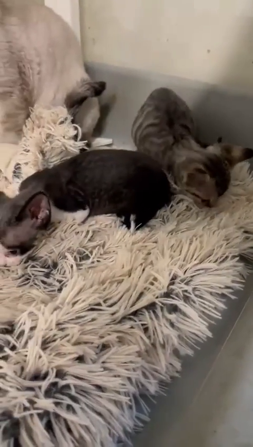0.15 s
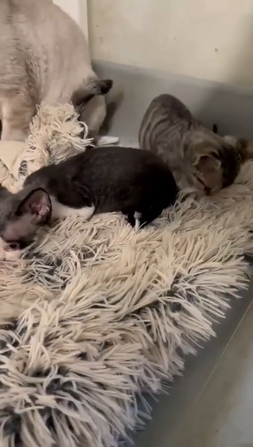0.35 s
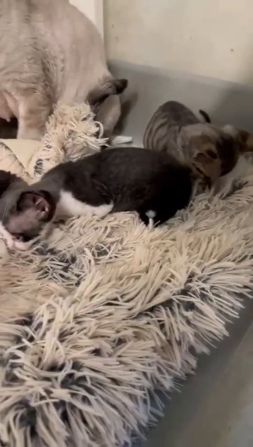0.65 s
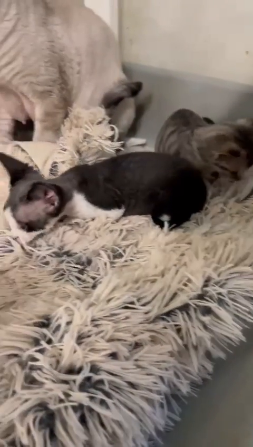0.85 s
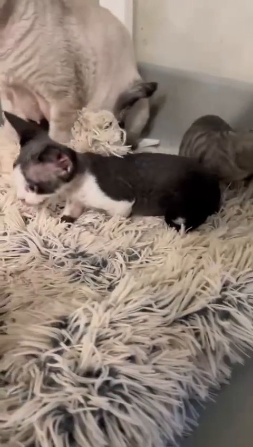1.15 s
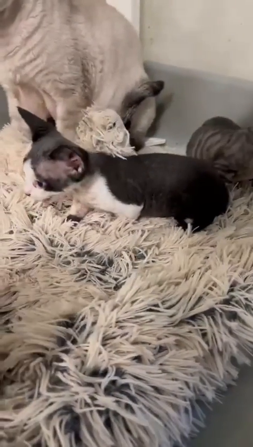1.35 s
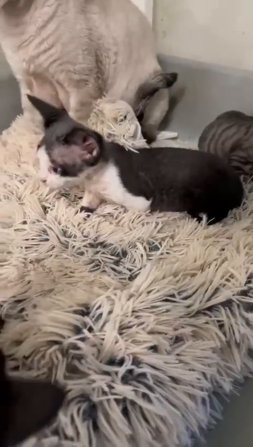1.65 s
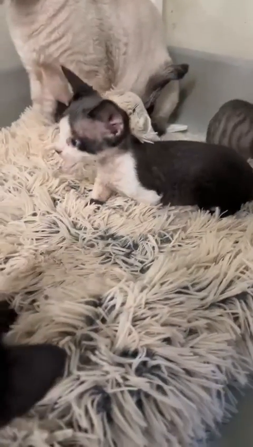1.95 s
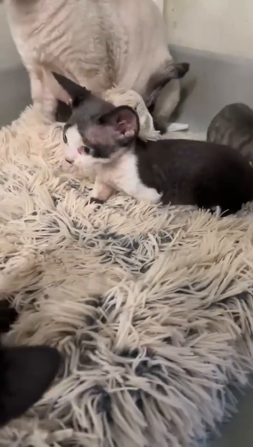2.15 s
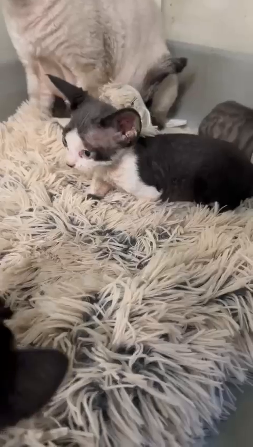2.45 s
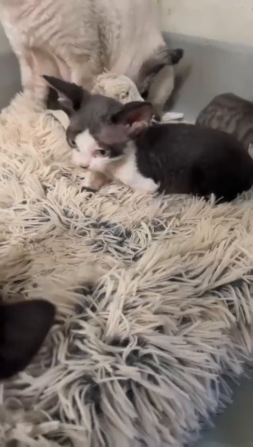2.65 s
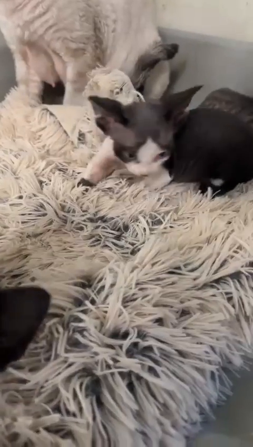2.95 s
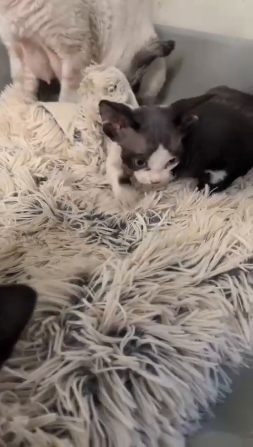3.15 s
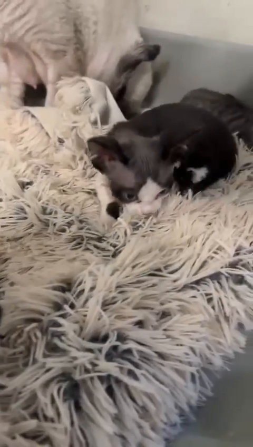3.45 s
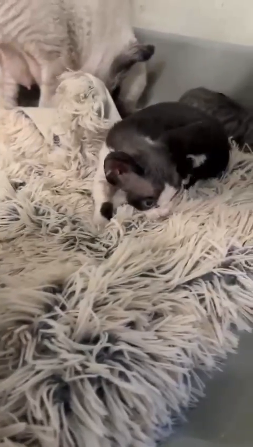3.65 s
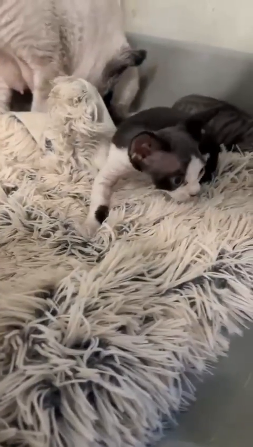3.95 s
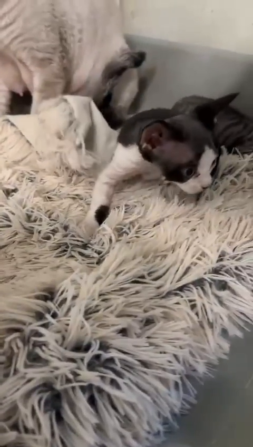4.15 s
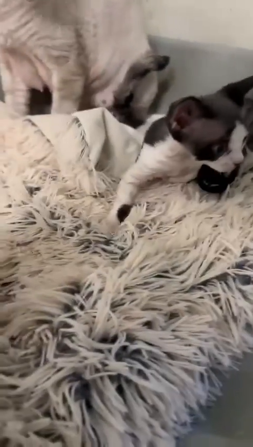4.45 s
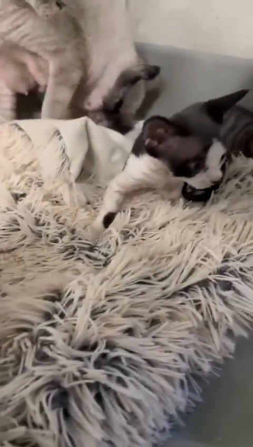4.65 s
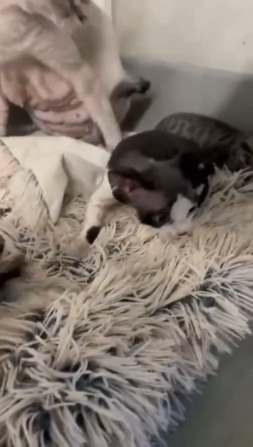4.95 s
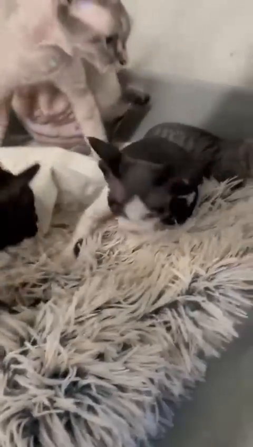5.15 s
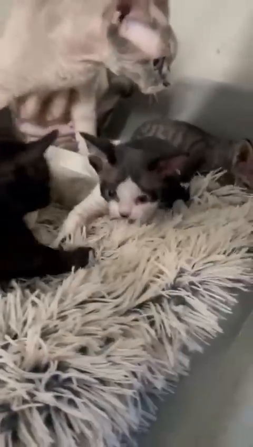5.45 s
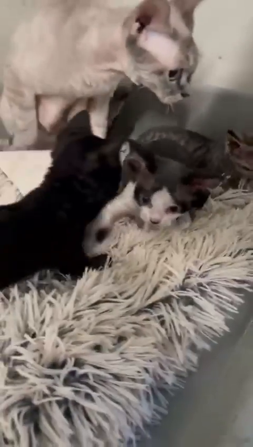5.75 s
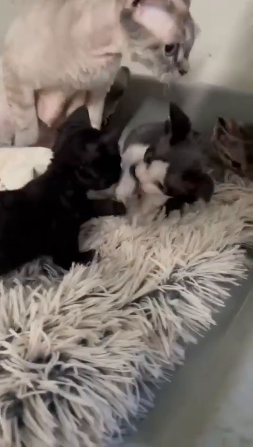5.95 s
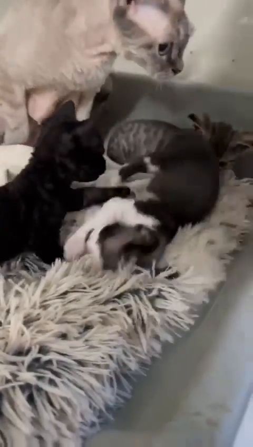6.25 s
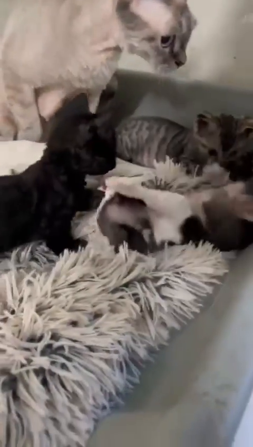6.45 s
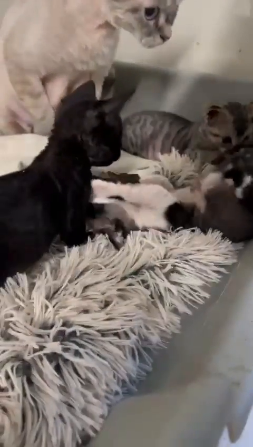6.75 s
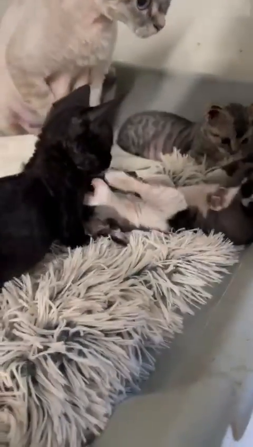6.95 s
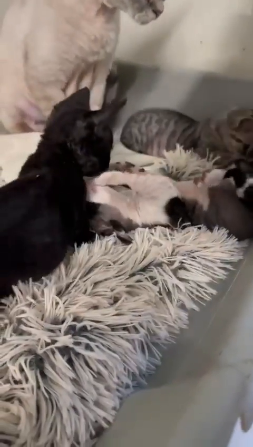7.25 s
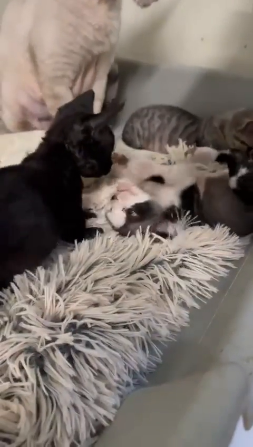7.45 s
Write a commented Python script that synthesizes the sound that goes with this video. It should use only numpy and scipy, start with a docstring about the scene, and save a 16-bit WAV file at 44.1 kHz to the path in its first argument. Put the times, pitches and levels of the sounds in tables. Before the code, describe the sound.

Kittens shuffle on a shaggy cushion in a plastic bed, scuffling with thumps, a whimper, a short trilling mew and one very hard knock.

```python
"""Kittens wrestle on a shaggy cushion in a plastic bed in a small, quiet room, close to a phone.
Bodies thud on the shell (filtered flexing modes), paws stamp (one damped swing), fur and claws scrape (noise);
knocks, one very hard, are a ping, a crack, a wash and a ring, and a thin tone follows the hardest.
One kitten whimpers and later gives a short trilling mew (harmonics through moving resonances).
The walls add a brief echo; filtered noise makes a low rumble and faint hiss."""
import sys
import numpy as np
from scipy import signal
from scipy.fft import rfft, irfft
from scipy.io import wavfile

SR = 44100
rng = np.random.default_rng(int(sys.argv[2]) if len(sys.argv) > 2 else 0)


def generate_wav(signal):
    """Clip the signal to [-1, 1] and save it as 16-bit WAV at the path in sys.argv[1]."""
    frames = np.transpose(np.atleast_2d(signal))
    scaled = np.clip(frames, -1, 1) * 32767
    pcm = np.round(scaled).astype(np.int16)
    wavfile.write(sys.argv[1], SR, pcm)


N = 334895
RING_T_S = np.arange(SR * 3 // 4) / SR  # time axis of blows and echo


def undb(db):
    """Decibels to gain."""
    return 10 ** (np.asarray(db) / 20)


def unit(x):
    """Scale to rms 1."""
    return x / np.sqrt(np.mean(x ** 2))


def add(track, start_s, sound):
    """Mix a sound into a track at start_s."""
    i = max(int(start_s * SR), 0)
    track[i:i + len(sound)] += sound[:N - i]


def colour(x, points):
    """Filter by a spectrum of (hz, level_db) points, interpolated over log frequency."""
    hz, level_db = np.transpose(points)
    f_hz = np.fft.rfftfreq(x.shape[-1], 1 / SR) + 1
    gain = undb(np.interp(np.log(f_hz), np.log(hz), level_db))
    return irfft(rfft(x) * gain, x.shape[-1])


def band(x, lo_hz, hi_hz, order=1):
    """Causal Butterworth band-pass."""
    edges_hz = [lo_hz, min(hi_hz, SR / 2 - 1000)]
    return signal.sosfilt(signal.butter(order, edges_hz, "band", fs=SR, output="sos"), x)


def ring(modes, scatter_db):
    """Decaying modes (hz, level_db, t60_s); each blow lands elsewhere and weights them afresh."""
    hz, level_db, t60_s = np.transpose(modes)[:, :, None]
    scatter = scatter_db * rng.standard_normal(hz.shape)
    size = undb(level_db + scatter - 60 * RING_T_S / t60_s)
    return np.sum(size * np.sin(2 * np.pi * hz * RING_T_S), axis=0)


def grains(count, rough_db):
    """Dense friction noise: tiny slips of uneven size, each under a millisecond."""
    slips = np.repeat(rng.standard_normal(count // 32 + 1), 32)[:count]
    return unit(rng.standard_normal(count) * undb(rough_db * slips))


def diffuse(count, alike=0):
    """Stereo noise from all sides at two spaced ports: alike in the bass, apart in the treble unless alike > 0."""
    port_gap_s = .00054
    f_hz = np.fft.rfftfreq(count, 1 / SR)
    share = np.clip(alike, 0, .95)
    likeness = share + (1 - share) * np.sinc(2 * f_hz * port_gap_s)
    weights = np.sqrt([1 + likeness, 1 - likeness])
    mid, side = irfft(rfft(rng.standard_normal((2, count))) * weights, count)
    return np.array([mid + side, mid - side]) / np.sqrt(2)


def from_left(x, pan_db):
    """Sound from the left reaches that port first and louder."""
    lag_samples = 23
    return np.array([x * undb(pan_db / 2), np.roll(x, lag_samples) * undb(-pan_db / 2)])


def room(x, wet_db, t60_low_s=.3, t60_high_s=.18):
    """Close walls follow the direct sound with a dense, short echo that holds little deep bass."""
    ears = band(diffuse(len(RING_T_S)), 162, 12600, order=2)
    low = band(ears, 100, 2100)
    high = ears - low
    tail = low * 1000 ** (-RING_T_S / t60_low_s) + high * 1000 ** (-RING_T_S / t60_high_s)
    tail *= RING_T_S > .002  # gap before the echo, s
    tail *= undb(wet_db) / np.sqrt(np.sum(tail ** 2) / 2)
    return x + signal.fftconvolve(np.atleast_2d(x), tail, axes=1)[:, :N]


def push(length_s):
    """Envelope of one shift: the kitten leans in, eases off and stops."""
    rise_share, fade_db, release_s = .22, 10, .03
    t_s = np.arange(0, length_s, 1 / SR)
    rise_s = rise_share * length_s
    easing = undb(-fade_db * np.maximum(t_s - rise_s, 0) / (length_s - rise_s))
    return np.minimum(t_s / rise_s, 1) * easing * np.minimum((length_s - t_s) / release_s, 1)


def shuffling():
    """Paws knead the padding with a low mutter while the shaggy pile rustles."""
    # kitten shifting on the cushion, relative levels: start_s, length_s, weight_db, rub_db
    shifts = [(0, 0.1, -52.5, -74.5), (0.09, 0.25, -50.5, -71), (0.278, 0.38, -58, -77.5),
              (0.52, 0.25, -60.5, -73), (0.749, 0.31, -60.5, -74.5), (0.982, 0.28, -68, -84),
              (1.5, 0.33, -69, -81.5), (1.639, 0.71, -63.5, -80.5), (2.16, 0.33, -63.5, -77),
              (2.501, 0.12, -55.5, -78.5), (2.81, 0.13, -64.5, -85), (3.184, 0.51, -74.5, -85),
              (3.984, 0.08, -101, -80), (4.83, 0.3, -77, -77), (5.136, 0.13, -58, -73.5),
              (5.381, 0.49, -86, -78.5), (6.038, 0.71, -102, -79), (6.371, 0.066, -54.5, -74),
              (7.333, 0.15, -76, -71.5)]
    # spectrum of the padding: hz, level_db
    padding = [(24, -46), (40, 7), (130, -4.5), (177, -21), (278, -18), (475, -25.5), (560, -23),
               (745, -29), (916, -32.5), (2500, -42.5), (3250, -61), (5500, -120)]
    # spectrum of the pile: hz, level_db
    fur = [(500, -9), (1000, 5.5), (2200, 10), (4000, 4), (6500, 2.5), (8500, -13.5), (11000, -6.5)]
    # the padding stirs faintly between shifts too
    restless_db, wander_db = -82, 4
    wander = unit(band(rng.standard_normal(N), 0.39, 17.0, order=2))
    weight = undb(restless_db + wander_db * wander)
    rub = np.zeros(N)
    for start_s, length_s, weight_db, rub_db in shifts:
        add(weight, start_s, undb(weight_db) * push(length_s))
        add(rub, start_s, undb(rub_db) * push(length_s))
    mutter = colour(grains(N, rough_db=4.5), padding)
    mutter /= np.std(band(mutter, 200, 900, order=3))
    rustle = unit(colour(grains(N, rough_db=7.5), fur))
    return undb(-2) * weight * mutter + undb(7) * rub * rustle


def air():
    """The building rumbles from all sides; a faint steady hiss sits near the middle."""
    # overall spectrum of the background: hz, level_db
    background = [(15, -51), (25, -4), (71, 5.5), (99, -2.5), (260, -27.5), (303, -12), (336, -24),
                  (381, -27), (468, -34.5), (721, -34), (954, -39.5), (2270, -27), (3320, -36),
                  (7700, -46.5), (11000, -69.5), (14300, -96), (22000, -120)]
    level_db = -60
    rumble = colour(diffuse(N, alike=0), [(1000, -0.5), (1800, -18.5), (3000, -29.5)])
    hiss = colour(diffuse(N, alike=0.81), [(600, -31.5), (1100, 0.5), (1700, 5.5)])
    noise = band(colour(rumble + hiss, background), 32, 20000, order=2)
    return undb(level_db) * noise / np.std(noise.mean(axis=0))


def bumps():
    """A soft body sets the shell flexing; modes near its own pace answer most."""
    # bodies on the shell, heavier and softer pushes lower: start_s, level_db (peak, dry), centre_hz
    bump_table = [(.005, -45.5, 251), (0.123, -38.5, 166), (0.171, -41, 209), (.185, -38.5, 110),
                  (0.347, -42.5, 237), (0.564, -41.5, 163), (0.814, -54.5, 236), (1.971, -32, 71.4),
                  (1.992, -31, 247), (2.008, -26.5, 287), (2.032, -26, 89), (2.076, -31.5, 117),
                  (2.111, -35, 199), (2.166, -36, 102), (2.24, -36.5, 149), (2.283, -36, 55.5),
                  (2.541, -47.5, 244), (2.607, -46.5, 61), (2.867, -53.5, 250), (4.316, -52.5, 170),
                  (5.076, -28, 380), (5.083, -28.5, 166), (5.102, -38.5, 76), (5.75, -47, 104),
                  (6.414, -32, 45.6), (6.449, -37, 43)]
    # low flexing modes of the loaded shell: hz, level_db, t60_s
    flex = [(52, 0, .22), (66, -5, .16), (91, 0, .22), (116, -4, .16), (140, -3, .18), (170, -7, .1),
            (198, -3, .13), (240, -7, .08), (278, 2, .13), (312, -2, .09), (355, -10, .06), (409, -11, .1),
            (479, -12, .06), (635, -9, .06)]
    out = np.zeros(N)
    for start_s, level_db, centre_hz in bump_table:
        thud = band(ring(flex, scatter_db=3), centre_hz / 1.32, centre_hz * 1.4, order=2)
        add(out, start_s, undb(level_db) * thud / np.abs(thud).max())
    return out


def scrapes():
    """Claws and fur skid over the plastic in short strokes; a claw that catches rasps in a narrow band."""
    # strokes along the wall: start_s, length_s, level_db (relative), rough_db, centre_hz, width_octaves
    strokes = [(0.103, 0.039, -57.5, 3, 1850, 2.6), (0.163, 0.067, -53, 4.5, 935, 2.73),
               (0.543, 0.025, -60, -7, 1880, 2.2), (0.617, 0.049, -69.5, 0, 4200, 1.2),
               (0.814, 0.011, -64, 12, 4000, 0.79), (0.879, 0.072, -68, 2, 4640, 1.9),
               (1.965, 0.087, -52, -2.5, 3620, 2.3), (1.991, 0.045, -45, 7, 4260, 1.1),
               (1.992, 0.058, -47, 6, 590, 2.1), (2.042, 0.06, -54.5, 2, 1470, 2.9),
               (2.164, 0.055, -41.5, 11, 5130, 1.7), (2.167, 0.043, -43.5, 4, 2190, 0.38),
               (2.165, 0.057, -51, -4.5, 560, 1.6), (5.012, 0.046, -63, 8, 4370, 2),
               (6.383, 0.014, -51.5, 1.5, 534, 0.6), (6.406, .013, -56, 4.5, 640, 0.74)]
    out = np.zeros(N)
    for start_s, length_s, level_db, rough_db, centre_hz, width_octaves in strokes:
        count, spread = int(length_s * SR), 2 ** (width_octaves / 2)
        noise = grains(len(RING_T_S), rough_db)
        skid = unit(band(noise, centre_hz / spread, centre_hz * spread, order=2)[:count])
        add(out, start_s, undb(level_db) * skid * signal.windows.tukey(count, 0.29))
    return out


def knocks():
    """A dead ping at the contact; a crack, a short wash of dense modes and a ring from the whole shell."""
    # knocks and claw taps: start_s, level_db (relative), contact_hz, ring_db and ping_db (re level_db)
    knock_table = [(0.168, -40.5, 900, 3, -1), (1.057, -49, 1390, -28, 5.5), (1.538, -54, 1010, 3, 3.5),
                   (1.6, -55, 1130, -20, 5.5), (2.112, -32.5, 3280, -3.5, -16),
                   (2.158, -28, 1480, -3, -1.5), (2.175, -32, 2050, -22, 7), (2.201, -30, 2180, -27, -7),
                   (2.464, -45, 1580, -11, -11), (2.524, -50, 730, 7, 10.5), (4.004, -47, 980, -11.5, -2),
                   (4.99, -40.5, 2780, -2, -11), (5.056, -29, 1200, 7, -4), (5.067, -12.5, 2220, -8, -4.5),
                   (5.068, -20, 950, -2, -0.5), (5.077, -25.5, 4200, -16, -25), (5.111, -40, 450, -17, -5),
                   (5.7435, -37, 3460, -20, 0.5), (5.746, -40, 880, -7, -7),
                   (5.811, -44.5, 2400, -24, -7.5)]
    # ringing modes of the plastic walls: hz, level_db, t60_s
    wall = [(198, -2, .25), (280, -2, .22), (409, 0, .26), (435, -1, .2), (522, -1, .22), (636, 0, .16),
            (760, -2, .13), (830, -2, .13), (928, -3, .12), (1050, 0, .14), (1210, -3, .18),
            (1726, -4, .15), (2133, 3, .13), (2256, -5, .16), (2552, -11, .17), (2864, -12, .16),
            (3338, -9, .17), (3540, -4, .15)]
    crack_s, ping_s, wash_s = 0.0028, 0.001, 0.023  # decay to 1/e
    wash_db, modes_db = -7, -22
    contact, shell = np.zeros((2, N))
    for start_s, level_db, hz, ring_db, ping_db in knock_table:
        ping = np.exp(-RING_T_S / ping_s) * np.sin(2 * np.pi * hz * RING_T_S)
        add(contact, start_s, undb(level_db + ping_db) * ping)
        noise = 0.29 * unit(band(rng.standard_normal(len(RING_T_S)), hz / 5.7, hz * 1.44))
        add(contact, start_s, undb(level_db) * noise * np.exp(-RING_T_S / crack_s))
        wash = undb(wash_db) * band(noise, 120, hz * 1.5) * np.exp(-RING_T_S / wash_s)
        tone = undb(modes_db) * band(ring(wall, scatter_db=1), hz / 3, hz * 0.8)
        add(shell, start_s, undb(level_db + ring_db) * (wash + tone))
    return contact, shell


def stamps():
    """A paw lands and stays down: the floor of the bed gives one swing and is damped at once."""
    # paws on the floor of the bed: start_s, level_db (peak, dry), swing_hz
    stamp_table = [(0.174, -33.5, 170), (0.194, -33.5, 129), (2.018, -29.5, 262), (2.528, -34.5, 135),
                   (2.905, -42.5, 58.6), (6.397, -34, 184), (6.411, -35, 95)]
    swing_cycles = 0.63
    out = np.zeros(N)
    for start_s, level_db, swing_hz in stamp_table:
        cycles = swing_hz * RING_T_S
        swing = np.sin(2 * np.pi * cycles) * cycles * np.exp(-2 * cycles / swing_cycles)
        add(out, start_s, undb(level_db) * swing / np.abs(swing).max())
    return out


def voice(cry, flutter, throat_scale, tilt_db):
    """Harmonics with a fast trill, more ragged with roughness, through resonances that move with the mouth."""
    # throat and mouth resonances: width_hz, then centre_hz and level_db, each for mouth parting, wide, closing
    throat = [(520, 890, 720, 640, -1, 0, 4), (520, 1600, 1500, 1600, -0.5, 1, -6),
              (480, 2000, 2270, 2350, -14, -4.5, -16), (336, 2600, 2790, 2800, -21, -14, -9),
              (400, 3550, 3400, 1600, -19.5, -28, -4), (800, 3960, 4310, 4030, -9.5, -11.5, -11.5),
              (700, 5200, 5240, 4650, -40.5, -23, -12.5), (1500, 4200, 6800, 5900, -46.5, -26.5, -32.5),
              (650, 8000, 7690, 7600, -52, -13.5, -29.5)]
    trill_hz, trill_extra_hz, trill_settles_s, trill_cusp = 43.7, 20, .12, .2
    # scatter at full roughness, shares: of pitch, of the trill's pace, of its depth; then of loudness
    jitter, trill_wander, trill_uneven, shimmer_db = .022, .13, .45, 2.8

    times_s, *controls = np.transpose(cry)
    t_s = np.arange(0, times_s[-1] - times_s[0], 1 / SR)
    hz, level_db, depth, rough, mouth = (np.interp(t_s + times_s[0], times_s, c) for c in controls)
    drift, uneven, shake, shimmer = (
        rough * unit(band(rng.standard_normal(SR), lo_hz, hi_hz, order=2))[:len(t_s)]
        for lo_hz, hi_hz in [(8, 40), (12, 45), (60, 200), (20, 160)])

    pace_hz = (trill_hz + trill_extra_hz * np.exp(-t_s / trill_settles_s)) * (1 + trill_wander * drift)
    cycle = 2 * np.pi * np.cumsum(pace_hz) / SR
    # each trill is a sharp flick upwards and a rounded trough
    trill = -(trill_cusp * np.cos(2 * cycle) + np.sin(cycle)) * (1 + trill_uneven * uneven)
    pitch_hz = hz * (1 + depth * trill + jitter * shake)
    phase = 2 * np.pi * np.cumsum(pitch_hz) / SR

    k = np.arange(1, 13)[:, None]  # harmonic number
    gain = 0
    for width_hz, *shape in throat:
        centre_hz, peak_db = (np.interp(mouth, np.arange(len(v)), v) for v in np.split(np.array(shape), 2))
        offset = 2 * (k * pitch_hz - centre_hz * throat_scale) / width_hz
        gain = gain + undb(peak_db) / (1 + offset ** 2) ** 2
    gain *= undb(tilt_db * np.log2(k))
    # the tone thins at the top of each trill, overtones most
    thinning = np.exp(-flutter * trill * depth / depth.max() * np.where(k > 1, 1, .3))
    tone = np.sum(gain * thinning * np.sin(k * phase), axis=0)
    tone /= np.sqrt(np.sum(gain ** 2, axis=0) / 2)
    out = np.zeros(N)
    add(out, times_s[0], undb(level_db + shimmer_db * shimmer) * tone)
    return out


def singing():
    """A thin tone swells and rings on as the hardest knock dies away."""
    start_s, hz, level_db, t60_s, rise_s = 5.165, 1975, -58, .55, .02
    tone = ring([(hz, 0, t60_s)], scatter_db=0)
    out = np.zeros(N)
    add(out, start_s, undb(level_db) * np.minimum(RING_T_S / rise_s, 1) * tone)
    return out


def scene():
    """Bed, kittens and room together."""
    # cries: time_s, pitch_hz, level_db (relative), trill_depth (share of pitch), roughness (0-1),
    # mouth (0 parting, 1 wide, 2 closing)
    whimper = [(1.841, 548, -69, 0.028, .5, 0), (1.872, 593, -54, 0.047, 0.82, 0),
               (1.915, 540, -60, 0.02, .7, 0), (1.965, 597, -52.5, 0.04, 0.87, 0),
               (2.02, 565, -46.5, 0.19, 1, 0)]  # starts before the pounce and swells into it
    mew = [(4.38, 925, -66, .005, .05, 0), (4.39, 928, -49.5, 0.015, .05, 0.28),
           (4.42, 908, -46, 0.073, 0.47, 0.11), (4.475, 889, -45, 0.07, 0.41, 0.84),
           (4.54, 833, -45.5, 0.13, 0.36, 0.89), (4.63, 813, -45.5, 0.1, 0.39, 1),
           (4.69, 811, -48, 0.12, 0.49, 1.26), (4.755, 809, -48, 0.08, 0.5, 1.7),
           (4.785, 736.4, -51.5, 0.13, 1, 2.1), (4.835, 696, -52, 0.11, 1, 2.5),
           (4.865, 680, -66, 0.056, 0.76, 2)]
    friction = undb(-4.5) * (shuffling() + scrapes())
    # rubbing happens deep in the bed and bounces briefly between its sides
    friction = room(friction, wet_db=4, t60_low_s=0.11, t60_high_s=0.063)
    thuds = room(from_left(bumps() + stamps(), pan_db=2), wet_db=-9)
    contact, shell = knocks()
    # the shell radiates all round, so much of it is heard by way of the walls
    hits = room(contact, wet_db=-5.5) + room(undb(-3) * shell, wet_db=0) + singing()
    cries = voice(whimper, flutter=.3, throat_scale=.64, tilt_db=-8)
    cries += voice(mew, flutter=.85, throat_scale=1, tilt_db=0)
    calls = room(cries, wet_db=-8.5, t60_low_s=.25)
    return thuds + hits + friction + undb(0.5) * calls + air()


def record(dry):
    """The phone softens the top octave and cuts above it; its left port turns the phase in a narrow band."""
    turn_hz, turn_q, top_hz = 608, 2.13, 11000
    left, right = colour(dry, [(8300, 0.0), (9500, -7.5), (11000, -18.0)])
    left = left - 2 * signal.lfilter(*signal.iirpeak(turn_hz, turn_q, fs=SR), left)
    return signal.sosfilt(signal.ellip(8, .2, 70, top_hz, fs=SR, output="sos"), [left, right])


dry = scene()
out = record(dry)
generate_wav(out)
```